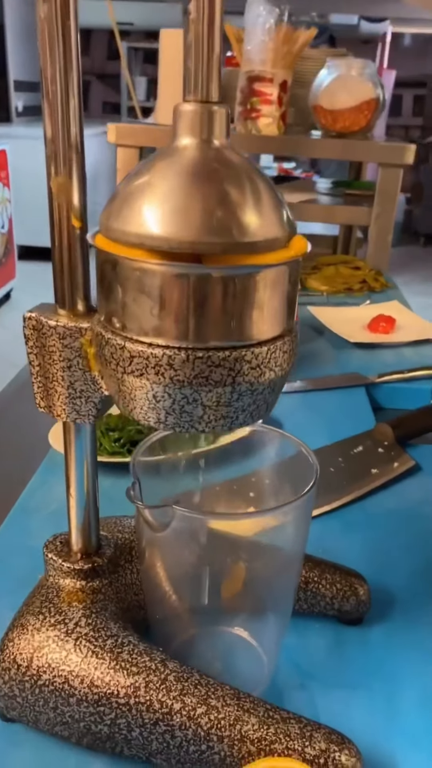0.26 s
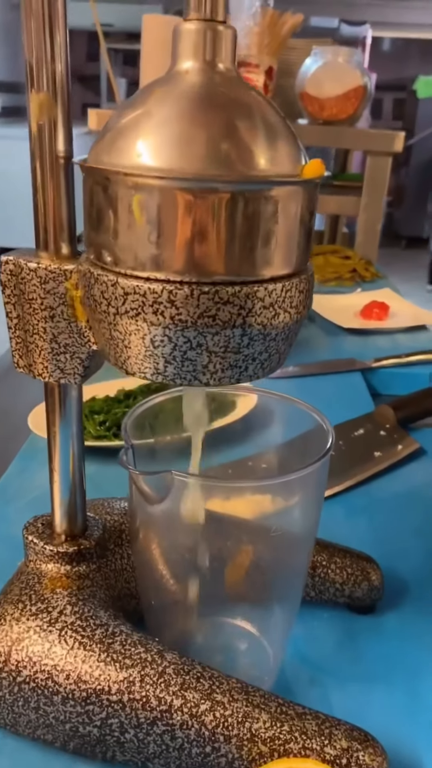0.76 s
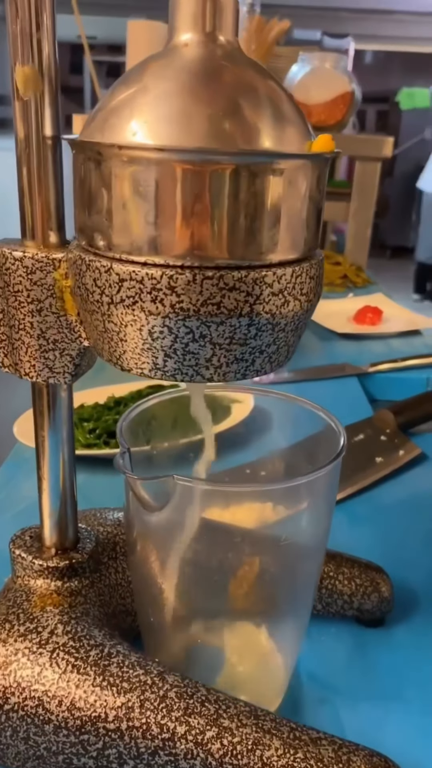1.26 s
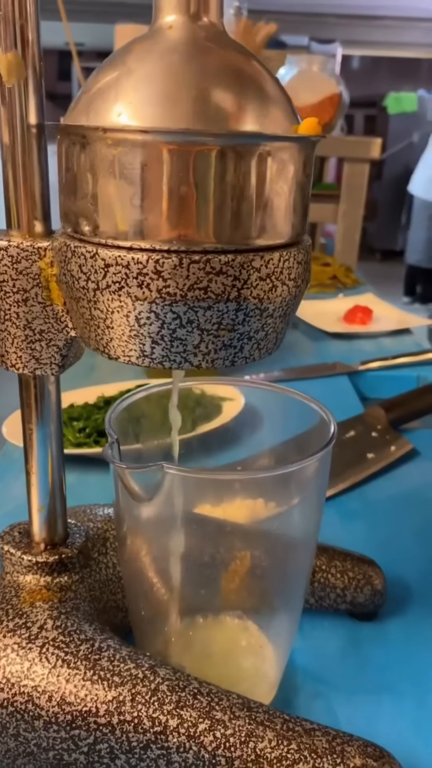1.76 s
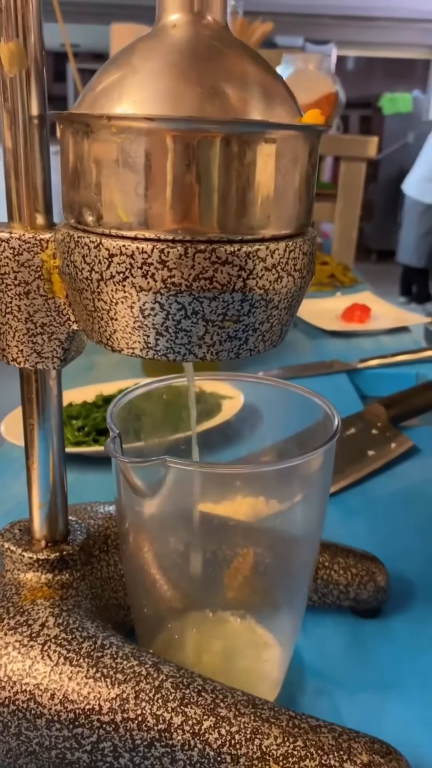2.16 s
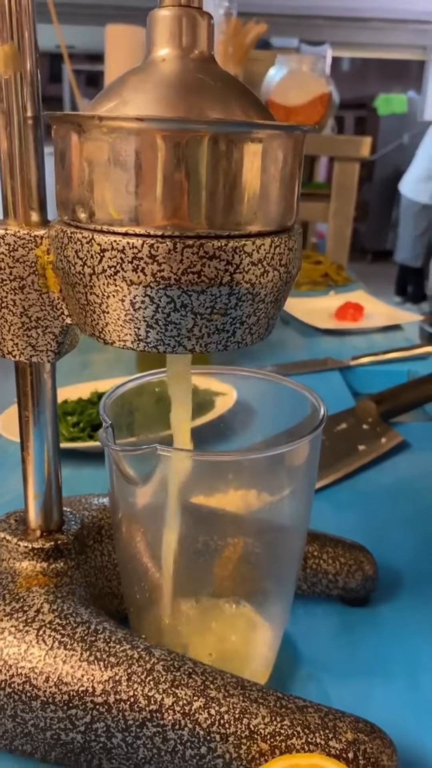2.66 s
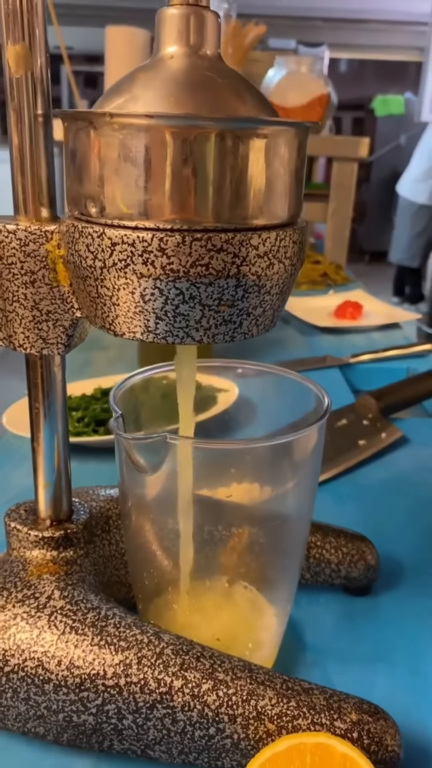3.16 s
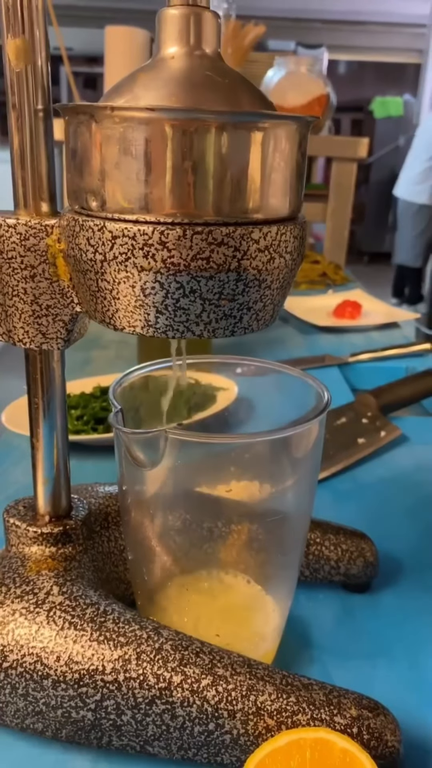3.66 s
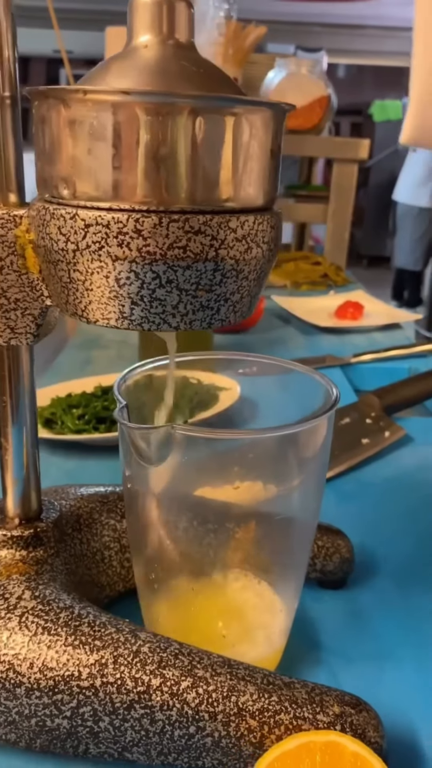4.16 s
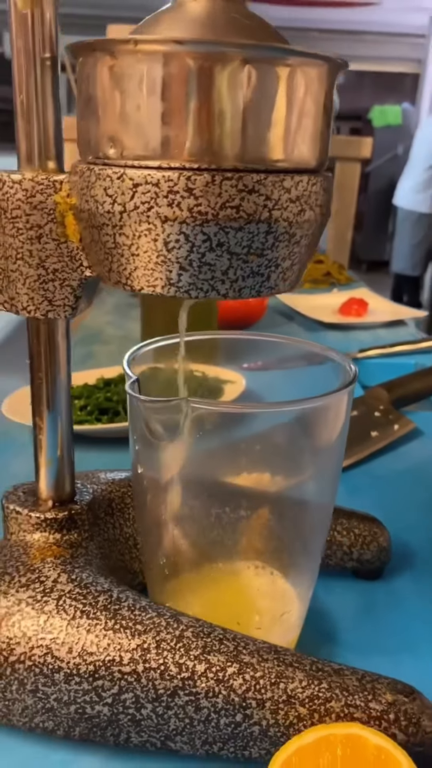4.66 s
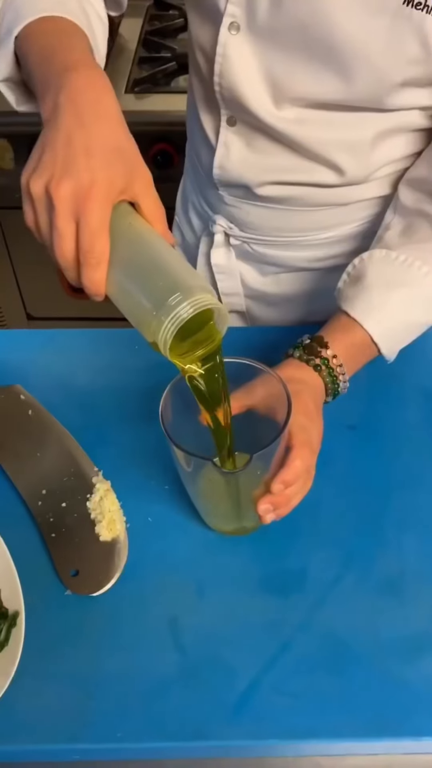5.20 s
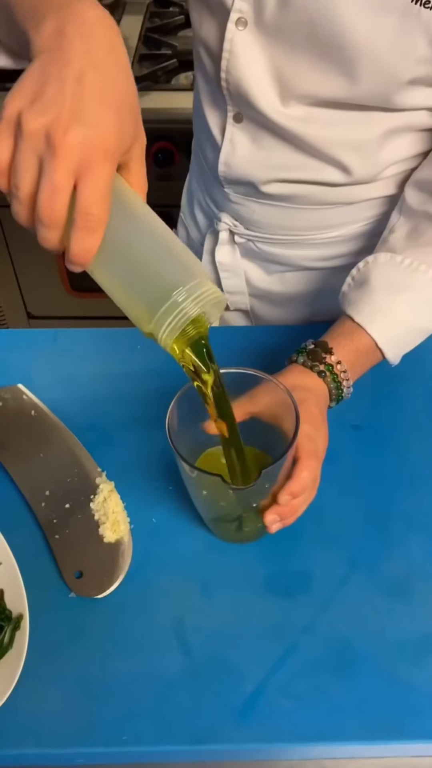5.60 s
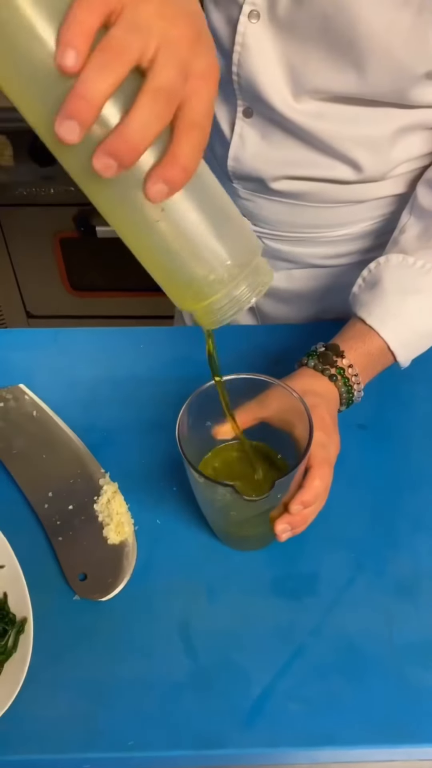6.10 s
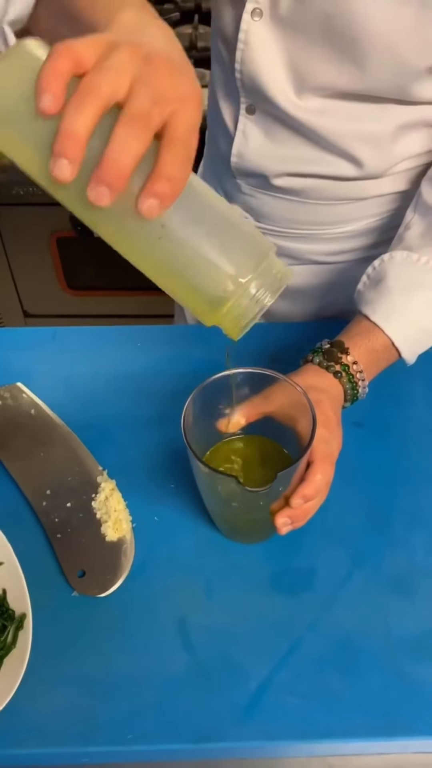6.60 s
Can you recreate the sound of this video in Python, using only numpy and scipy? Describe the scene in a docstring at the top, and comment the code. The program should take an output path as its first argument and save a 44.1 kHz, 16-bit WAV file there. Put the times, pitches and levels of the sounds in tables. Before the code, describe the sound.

A low, steady ventilation hum with airy noise fills a restaurant kitchen, heard in stereo. Close to the microphone, juice drips from a lever citrus press into a plastic jug, sparsely at first, then from about 0.7 seconds as an uneven trickle of wet splats and small ringing bubbles. The dripping is busiest between 2.4 and 3 seconds. The metal press knocks with a short ring at about 3 and 3.4 seconds, and its shaft gives a faint, high squeak around 3.7 seconds. The drops thin out, and the press clacks again at 4.6 seconds. At 4.85 seconds the sound cuts abruptly to a much quieter scene with only a soft hum. Oil pours almost silently, with just two faint drops near 5.1 seconds. Far across the kitchen, dishes clink at 5.7 seconds, then several times more softly between 6.2 and 6.8 seconds.

```python
"""Citrus press in a kitchen

Close to the stereo microphone, a lever press squeezes juice into a plastic jug over the low hum of
ventilation. Drops splat and trap ringing bubbles; the press knocks and its sliding shaft squeaks.
Then a cut to a much quieter scene: oil pours almost silently and dishes clink far across the kitchen."""
import sys
import numpy as np
from scipy import signal
from scipy.fft import rfft, irfft, next_fast_len
from scipy.io import wavfile
from scipy.ndimage import uniform_filter1d

SR = 44100
rng = np.random.default_rng(int(sys.argv[2]) if len(sys.argv) > 2 else 0)


def dump(signal):
    """Clip the signal to [-1, 1] and save it as 16-bit WAV at the path in sys.argv[1]."""
    limited = np.clip(np.atleast_2d(signal).T, -1, 1)
    pcm = np.round(limited * 32767).astype(np.int16)
    wavfile.write(sys.argv[1], SR, pcm)


N = 301644
CUT_S = 4.85  # the quiet scene begins


def gain_of(db):
    """Decibels to gain."""
    return 10 ** (np.asarray(db) / 20)


def unit_rms(x):
    """Scales to rms 1."""
    return x / np.sqrt(np.mean(x ** 2) + 1e-20)


def value_at(points, hz):
    """Interpolates (frequency, value) points on a log-frequency axis."""
    freqs, values = np.transpose(points)
    return np.interp(np.log(hz + 1), np.log(freqs + 1), values)


def fader(points):
    """Gain at every sample from (time [s], level [dB]) points."""
    times, levels = np.transpose(points)
    return gain_of(np.interp(np.arange(N) / SR, times, levels))


def add(mix, start, sound):
    """Mixes a sound in at start seconds."""
    part = mix[..., round(start * SR):][..., :sound.shape[-1]]
    part += sound[..., :part.shape[-1]]


def colour(x, points):
    """Equalises x by (frequency [Hz], gain [dB]) points."""
    size = next_fast_len(N + SR // 4)
    response = gain_of(value_at(points, np.fft.rfftfreq(size, 1 / SR)))
    return irfft(rfft(x, size) * response, size)[..., :N]


def resonate(x, hz, width):
    """One resonance: shifts hz down to zero, smooths, shifts back."""
    turn = np.exp(2j * np.pi * hz * np.arange(len(x)) / SR)
    pole = np.exp(-np.pi * width / SR)
    return 2 * (turn * signal.lfilter([1 - pole], [1, -pole], x / turn + 1e-18)).real


def band(x, hz, width):
    """The same resonance twice, for steeper skirts."""
    return resonate(resonate(x, hz, width), hz, width)


def patchy_noise(depth_db):
    """White noise whose level drifts in patches of time and frequency."""
    real, imag, drift = rng.standard_normal((N // 128 + 5, 257, 3)).T
    drift = unit_rms(uniform_filter1d(uniform_filter1d(drift, size=8, axis=0), size=20, axis=1))
    return signal.istft((real + 1j * imag) * gain_of(depth_db * drift), nperseg=512, noverlap=384)[1][:N]


# Resonances of the kitchen duct: (frequency [Hz], nominal width [Hz], level [dB])
DUCT_MODES = [(49, 5.3, -16.5), (106.3, 14.8, -4), (125.6, 7, -12.5), (176.31, 5.05, 0), (200.2, 12, -8),
              (238.5, 30, -15), (415.6, 6.4, -16.5), (330.4, 45, -16), (490.8, 12, -20), (566, 18, -28),
              (631.7, 24, -23), (757, 23, -27.5), (833.6, 54, -28)]
def duct_hum(steadiness=0.6, waver_db=1.07, waver_s=1):
    """Air noise rings the duct in fuzzy tones; quick swells are partly evened out, a slow waver added."""
    flow = rng.standard_normal(N)
    hum = unit_rms(sum(gain_of(db) * unit_rms(band(flow, hz, 1.27 * width))
                       for hz, width, db in DUCT_MODES))
    power = uniform_filter1d(hum ** 2, size=5000) + 1e-3
    waver = unit_rms(band(rng.standard_normal(N), 0, 1 / waver_s))
    return unit_rms(hum / power ** (steadiness / 2)) * gain_of(waver_db * waver)


# Kitchen air in the mid and side channels, one list a scene: (frequency [Hz], level [dB])
AIR_MID_SPECTRA = [
    [(15, -70), (25, -22.5), (53, -16), (92, -2.5), (135, -7.5), (185, -1), (279, -11), (401, -13),
     (549, -19), (619, -20.5), (1790, -33.5), (2800, -38), (4940, -43), (5570, -41), (6700, -47.5),
     (7100, -58), (8000, -103), (10400, -133), (17600, -120)],
    [(15, -62), (25, -4), (177, -2.5), (236, -11.5), (339, -5.5), (499, -17), (789, -20), (2770, -35),
     (4380, -38.5), (4940, -43), (5990, -39.5), (6600, -52.5), (8000, -87), (10400, -108), (17600, -120)],
]
AIR_SIDE_SPECTRA = [
    [(35, -55.5), (60, -27.5), (103, -29.5), (183, -5.5), (268, -7.5), (819, -9), (1140, -17.5),
     (1710, -30), (2680, -24), (3910, -36), (8360, -28.5), (10700, -32), (12500, -85), (16200, -107),
     (22000, -120)],
    [(35, -45), (60, -50), (168, -39.5), (245, -8), (536, -1), (1200, -12), (1830, -29), (2680, -14),
     (4090, -37), (7310, -31), (12500, -46), (16200, -84), (22000, -120)],
]
# Side air relative to mid air, one value a scene: (level [dB])
AIR_SIDE_LEVELS = [-10.5, -9.5]
# The air swells near the press and drops at the cut, one list a scene: (time [s], level [dB])
AIR_LEVELS = [
    [(0, -37), (1.2, -35.5), (2.4, -34.5), (2.7, -33), (4.84, -33.5)],
    [(4.87, -54), (5.8, -53), (6.84, -52.5)],
]
def ventilation(hum_over_air_db=(2, 1.5)):
    """Broad air noise all round the microphone with the duct hum in the centre, as mid and side."""
    mid, side = np.zeros((2, N))
    before_cut = np.clip((CUT_S - np.arange(N) / SR) / 0.008, 0, 1)
    hum = duct_hum()
    mid_noise, side_noise = patchy_noise(depth_db=2.5), patchy_noise(depth_db=4.5)
    for k, share in enumerate((before_cut, 1 - before_cut)):
        level = share * fader(AIR_LEVELS[k])
        mid += level * (unit_rms(colour(mid_noise, AIR_MID_SPECTRA[k])) + gain_of(hum_over_air_db[k]) * hum)
        side += level * gain_of(AIR_SIDE_LEVELS[k]) * unit_rms(colour(side_noise, AIR_SIDE_SPECTRA[k]))
    return np.array([mid, side])


# Reverberation of the kitchen: (frequency [Hz], t60 [s])
KITCHEN_DECAY = [(300, 0.78), (1500, 0.2), (4000, 0.31), (8000, 0.031)]
def kitchen_echo(x):
    """Sparse reflections of random sign reach left and right, each band dying at its own speed."""
    taps = np.zeros((2, SR // 2))
    arrivals = np.arange(200, SR // 2 - 20, 20) + rng.integers(0, 20, (2, (SR // 2 - 201) // 20))
    np.put_along_axis(taps, arrivals, rng.choice([-1., 1.], arrivals.shape), 1)
    hz, t, bands = signal.stft(taps, SR, nperseg=256)
    decay = gain_of(-60 * t / value_at(KITCHEN_DECAY, hz)[:, None])
    tail = signal.istft(bands * decay, SR, nperseg=256)[1]
    return signal.fftconvolve(x[None], tail / np.linalg.norm(tail[0]), axes=1)[:, :N]


def strike(blows, modes, roughness, flutter_hz):
    """Blows ring a set of modes; loose contact makes the higher ones flutter, a crack fills the gaps."""
    out, t = np.zeros(N), np.arange(SR // 2) / SR
    for start, db, centre_hz, spread, ring, crack_db in blows:
        noise = rng.standard_normal(len(t))
        crack = unit_rms(band(noise, centre_hz, centre_hz * spread))
        sound = gain_of(crack_db) * crack * np.exp(-t / (0.02 * ring))
        for hz, mode_db, t60 in modes:
            loose = np.clip(roughness * hz / (hz + 900), 0, 1)
            pure = np.sin(2 * np.pi * (hz * t + rng.random()))
            flutter = unit_rms(resonate(noise, hz, flutter_hz))
            struck_db = mode_db - 4.1 * (np.log2(hz / centre_hz) / spread) ** 2
            sound += gain_of(struck_db - 60 * t / (t60 * ring)) * ((1 - loose) * pure + loose * flutter)
        sound *= 1 - np.exp(-t / 0.001)
        add(out, start, gain_of(db) * sound / abs(sound).max())
    return out


# Modes of the crockery: (frequency [Hz], level [dB], t60 [s])
DISH_MODES = [(1072, 4, 0.29), (1354, -5, 0.2), (1600, 1, 0.4), (1750, 1, 0.35), (2485, 4.5, 0.35),
              (2860, 0, 0.3), (3080, -1.5, 0.25), (3840, 4, 0.29), (4000, 2, 0.27), (4280, -11, 0.22),
              (5520, 8, 0.25), (6020, 3, 0.28), (6300, -11, .15), (6700, 4, 0.2), (7130, 14, 0.2)]
# Far clinks: (time [s], level [dB], centre [Hz], spread [octaves], ring time [factor], crack [dB])
DISH_BLOWS = [(5.725, -29, 4170, 1.34, 1.38, 13), (6.207, -44, 1060, 0.34, 1.2, -8),
              (6.208, -52, 2580, 0.57, 1, -2), (6.373, -52, 1600, 0.2, 0.88, -11),
              (6.444, -48.5, 2880, 1, 3, 11), (6.691, -42.5, 2370, 1.46, 4, 20),
              (6.75, -46, 1750, 0.063, 1, 3)]
def dish_clinks():
    """Dishes touch loosely and ring at the far end of the kitchen."""
    return strike(DISH_BLOWS, DISH_MODES, roughness=0.9, flutter_hz=70)


# Brief flares of treble: (time [s], level [dB])
FLARE_EVENTS = [(0.804, -52), (1.1912, -59), (1.228, -45.5), (1.63, -56.5), (1.738, -49.5), (1.749, -45.5),
                (2, -58), (2.4253, -40.5), (2.469, -39), (2.785, -50), (3.035, -39.5), (3.345, -41),
                (3.639, -54), (3.67, -39), (4.379, -48.5), (4.583, -49), (4.606, -49)]
# Their colour: (frequency [Hz], gain [dB])
FLARE_SPECTRUM = [(6500, -20), (7500, 4), (9500, 2), (11800, 21.5)]
def treble_flares(rise_s=0.0065):
    """High hiss flares briefly at the sharpest splats and knocks."""
    out, age = np.zeros(N), np.arange(2000) / SR / rise_s
    for start, db in FLARE_EVENTS:
        add(out, start, gain_of(db) * age * np.exp(1 - age) * rng.standard_normal(len(age)))
    return colour(out, FLARE_SPECTRUM)


# Modes of the press shaft: (frequency [Hz], width [Hz], level [dB])
SHAFT_MODES = [(2600, 100, 6), (4200, 250, 2.5), (5680, 160, 6), (6870, 200, -14), (7220, 100, 5)]
# The shaft slides in its guide, close by: (time [s], level [dB])
SHAFT_SLIDE = [(3.57, -81), (3.63, -61.5), (3.70, -55.5), (3.78, -65), (3.82, -59), (3.87, -79)]
def shaft_squeak():
    """Uneven slips of the shaft scrape its modes, each in its own fits."""
    squeak, t = np.zeros(N), np.arange(N) / SR
    for hz, width, db in SHAFT_MODES:
        fits = unit_rms(uniform_filter1d(rng.standard_normal(N), size=700))
        scrape = resonate(resonate(rng.standard_normal(N), hz, width), hz, 3 * width)
        squeak += gain_of(db + 4.1 * fits) * unit_rms(scrape)
    sliding = (t > SHAFT_SLIDE[0][0]) & (t < SHAFT_SLIDE[-1][0])
    return squeak * fader(SHAFT_SLIDE) * sliding


# Modes of the press: (frequency [Hz], level [dB], t60 [s])
PRESS_MODES = [(325, 12.5, 0.15), (395, 11, 0.16), (576, 4, 0.14), (747, 4, 0.11), (792, 4.5, 0.16),
               (1560, -3, 0.54), (1604, 1.5, 0.17), (1885, 0.5, 0.28), (2250, -12, 0.48), (2850, -5, 0.45),
               (2990, -5.5, 0.3), (3877, 0, 0.2), (4220, -10, 0.26), (4720, -2, 0.36), (5020, -9.5, 0.5),
               (6100, -13.5, 0.3), (7150, 10, 0.1)]
# Close knocks: (time [s], level [dB], centre [Hz], spread [octaves], ring time [factor], crack [dB])
PRESS_BLOWS = [(3.042, -14.5, 1560, 1.1, 1.38, 6.5), (3.047, -16.5, 373, 0.65, 0.85, 8.5),
               (3.049, -14.5, 826, 0.29, 0.3, -0.5), (3.08, -20, 800, 0.44, 0.65, 1.5),
               (3.358, -18.5, 2900, 2.26, 1.2, -0.5), (3.366, -42.5, 4000, 0.2, 1.7, -11.5),
               (4.572, -27, 3200, 1, 0.12, 10), (4.573, -39, 1604, 0.087, 0.72, -13),
               (4.574, -21, 394, 0.24, 0.14, 3), (4.589, -29.5, 3800, 0.65, 0.06, 5),
               (4.5965, -17, 576, 0.12, 0.37, -10.5), (4.611, -32, 3020, 1.2, 0.13, 0),
               (4.612, -47, 1604, 0.045, 2.8, -9)]
def press_knocks():
    """The press knocks on its stand and rings, near the microphone."""
    return strike(PRESS_BLOWS, PRESS_MODES, roughness=0.66, flutter_hz=74.5)


# Air column of the plastic jug: (frequency [Hz], width [Hz], level [dB])
JUG_MODES = [(1450, 300, 0), (2780, 400, 0), (4150, 550, -1), (5500, 900, -2), (8500, 5000, -2)]
def jug(stereo):
    """The air over the juice resonates, colouring each channel."""
    return np.array([sum(gain_of(db) * resonate(channel, hz, width) * np.sqrt(500 / width)
                         for hz, width, db in JUG_MODES) for channel in stereo])


def bubble(hz, t60, rise, samples):
    """A trapped bubble swells and rings, its pitch rising and its ring cut short near the surface."""
    t = np.arange(samples) / SR
    envelope = gain_of(-60 * (t / t60) ** 1.5) * (1 - np.exp(-(t * hz / 3) ** 1.5))
    return np.sin(2 * np.pi * hz * t * (1 + rise * t / t60)) * envelope


# Juice streaming into the jug, close up: (time [s], level [dB])
JUICE_FLOW = [(0, -82), (0.5, -64.5), (1.0, -56.5), (1.7, -57.5), (1.88, -58), (1.98, -47), (2.07, -59),
              (2.38, -56), (2.5, -52.5), (2.6, -43), (2.83, -53), (3.26, -54), (3.41, -43), (3.65, -59.5),
              (3.88, -64), (4.05, -56), (4.57, -55), (4.69, -69), (4.84, -89)]
def spatter(droplets_per_s=3000, pitches=24):
    """The stream breaks into droplets of many sizes, each a short pitched blob, over a wet crackle."""
    sizes = gain_of(3.3 * np.minimum(rng.exponential(1, N), 5))
    droplets = sizes * (rng.random(N) < droplets_per_s / SR)
    pitch_index, blobs = rng.integers(0, pitches, N), np.zeros((2, N))
    for k, hz in enumerate(np.geomspace(1300, 7000, pitches)):
        blob = bubble(hz, t60=24 / hz, rise=0.18, samples=800) * gain_of(7.5 * np.log2(hz / 3000))
        blobs[k % 2] += signal.oaconvolve(droplets * (pitch_index == k), blob)[:N]
    age = np.arange(600) / 180
    bursts = signal.oaconvolve(droplets * (pitch_index < 8), age * np.exp(-age))[:N]
    crackle = jug(bursts * rng.standard_normal((2, N)))
    blobs = jug(blobs + 0.5 * blobs[::-1])  # each channel also hears the other's droplets
    stream = unit_rms(unit_rms(blobs) + 0.9 * unit_rms(crackle))
    return stream * fader(JUICE_FLOW) * (np.arange(N) < CUT_S * SR)


# Close drops of juice in the jug and, after the cut, the first oil:
# (time [s], level [dB], bubble pitch [Hz], relative splat level [dB])
DROP_EVENTS = [(0.0933, -47, 2850, 10.5), (0.404, -51, 2720, 13), (0.53, -48, 4300, 10),
               (0.695, -41, 2400, -13), (0.7661, -32.5, 1490, -1), (0.786, -25, 4260, -25),
               (0.816, -18.5, 1400, -11), (0.8175, -32.5, 2180, -7), (0.82, -30, 3240, -12),
               (0.8226, -27, 2650, -20), (0.847, -37.5, 4300, 9), (0.894, -35, 5150, 2),
               (0.9232, -27, 3980, 0), (1.031, -45.5, 1450, 21), (1.085, -30, 4230, 0),
               (1.187, -46, 2760, 14.5), (1.2365, -19.5, 3890, -15.5), (1.311, -32, 3380, -1),
               (1.3278, -39.5, 4350, 8), (1.3492, -30.5, 5300, -6.5), (1.499, -39.5, 1490, 4),
               (1.763, -19, 5730, -13.5), (1.78, -41, 2000, -2.5), (1.81, -44, 2280, -10),
               (1.82, -40, 3400, -13), (1.924, -40.5, 2270, 7.5), (1.998, -36.5, 4000, 5.5),
               (2.074, -40, 2050, -7), (2.0945, -45.5, 1070, -3), (2.106, -32.5, 915, -10.5),
               (2.114, -37, 1390, -12), (2.181, -39.5, 3950, -5), (2.182, -41.5, 1110, -8),
               (2.191, -35, 1010, 1.5), (2.274, -45.5, 1067, -7), (2.3, -39.5, 3000, 5),
               (2.353, -29.5, 5200, -21), (2.4266, -23, 2860, 0.5), (2.44, -29.5, 3380, -6.5),
               (2.458, -32, 5200, -7), (2.4738, -36.5, 3440, 1.5), (2.5054, -29.5, 1777, 5.5),
               (2.506, -38, 2940, -16), (2.513, -25.5, 4520, -24), (2.535, -31, 1476, 4),
               (2.538, -35.5, 2950, -9), (2.549, -28.5, 966, -4), (2.557, -29.5, 998, -3.5),
               (2.581, -25, 1453, 1), (2.585, -30, 4700, 1.5), (2.61, -42, 4180, -8),
               (2.631, -33.5, 1940, -12), (2.649, -33, 3020, -12), (2.658, -32, 3130, -4),
               (2.666, -34, 3120, -2), (2.678, -29, 1480, 5.5), (2.706, -26.5, 2700, -4),
               (2.722, -23, 2620, -8.5), (2.7233, -24, 1855, -7), (2.7333, -26, 2640, 3.5),
               (2.787, -34.5, 2860, 0), (2.789, -27.5, 6300, -7), (2.805, -38, 2860, 0),
               (2.8264, -22, 1320, -24.5), (2.868, -37.5, 1600, 4), (2.897, -32.5, 3300, 1),
               (2.935, -40, 2870, -10.5), (2.959, -14.5, 2850, -13), (2.976, -28, 2820, -19.5),
               (2.99, -26.5, 1505, 4), (3.301, -34, 4450, -24), (3.314, -19, 545, -28),
               (3.362, -17.5, 846, -28.5), (3.21, -35.5, 1600, 4.5), (3.235, -36, 3600, 4),
               (3.459, -30.5, 1640, -14), (3.536, -28.5, 5100, -9), (3.547, -34.5, 1480, -21),
               (3.814, -30.5, 887, -0.5), (3.935, -39, 2810, 11), (4.0656, -33, 2290, -4),
               (4.3866, -43.5, 1035, 13.5), (4.491, -33.5, 1530, -4), (4.52, -34, 4350, -5),
               (4.559, -31.5, 4500, -29), (4.6906, -36.5, 2980, 1.5), (4.7875, -29.5, 4600, -3.5),
               (5.051, -37.5, 2410, -6), (5.069, -44, 2980, 2)]
def drops(ring_cycles=12, ring_s=0.0058, pool_pan_db=-1.5, scatter_db=5.5, stray_s=0.000015):
    """Each drop traps a quick bubble, with a wet blur at its pitch and a sharp splat through the jug."""
    plops, splats = np.zeros((2, 2, N))
    t = np.arange(3000) / SR
    splat_envelope = (np.exp(-t / 0.0025) + 0.25 * np.exp(-t / 0.014)) * (1 - np.exp(-t / 0.001))
    for start, db, hz, splat_db in DROP_EVENTS:
        pan_db = rng.normal(pool_pan_db, scatter_db)  # where it lands, left minus right
        lag_s = rng.normal(0, stray_s)  # between the two microphone ports
        splat = rng.standard_normal(len(t)) * splat_envelope
        blur = band(splat, hz, 0.45 * hz) * np.sqrt(6000 / hz)
        plop = bubble(hz, t60=ring_cycles / hz + ring_s, rise=0.08, samples=len(t)) + 0.35 * blur
        plop = 0.67 * plop / abs(plop).max()
        for channel, sign in enumerate((1, -1)):
            arrival, gain = start + sign * lag_s / 2, gain_of(db + sign * pan_db / 2)
            add(plops[channel], arrival, gain * plop)
            add(splats[channel], arrival, gain * gain_of(splat_db) * splat)
    return plops + jug(splats)


# Tone of the centre sound, dull above about 7 kHz: (frequency [Hz], gain [dB])
MID_TONE = [(5800, -1), (6600, -1), (7200, -8.5), (12000, -78)]
# Stereo width of the near sounds: (frequency [Hz], gain [dB])
SIDE_TONE = [(80, -46.5), (250, -24.5), (700, -3.5), (2000, -9.5), (4000, -11), (10500, -1), (12500, 10.5)]
# Lean of the stereo picture: (frequency [Hz], left minus right [dB])
STEREO_LEAN = [(40, 0), (70, .4), (150, 2.4), (350, 2.7), (700, 1.8), (1400, .4), (2800, -.7), (6000, -.8),
               (10000, 0)]
def scene():
    """Close juice and press, far dishes and kitchen air meet as mid and side, then as left and right."""
    juice, dishes, press = drops() + spatter(), dish_clinks(), press_knocks()
    treble = shaft_squeak() + treble_flares()
    echo = kitchen_echo(gain_of(-11) * juice.mean(0) + gain_of(-9) * press + gain_of(-6.5) * dishes)
    heard = juice + press + 0.5 * dishes + echo
    cut = round(CUT_S * SR)
    heard[:, cut:cut + 6000] = 0  # the cut ends the first scene's echoes
    close = juice.mean(0) + press
    late = np.append(np.zeros(12), close)[:N]  # the side arrives a little after the mid
    side_echo = gain_of(-8) * kitchen_echo(close)[1] * (np.arange(N) < cut)
    mid = colour(heard.mean(0), MID_TONE) + treble
    side = colour((heard[0] - heard[1]) / 2 + 0.4 * late + side_echo + 0.54 * treble, SIDE_TONE)
    mid, side = np.array([mid, side]) + ventilation()
    early = np.append(mid[2:], [0, 0])  # the left port hears the mid two samples early
    left = colour(early, [(hz, db / 2) for hz, db in STEREO_LEAN]) + side
    right = colour(mid, [(hz, -db / 2) for hz, db in STEREO_LEAN]) - side
    return np.array([left, right])


# Response of the microphone: (frequency [Hz], gain [dB])
MIC_RESPONSE = [(25, -6), (45, -0.5), (11300, 3.5), (12300, -34)]
def record(dry):
    """The microphone colours the sound, and a steep low-pass ends the band at 12.3 kHz."""
    lowpass = signal.firwin(511, 12300, window=("kaiser", 9), fs=SR)
    return signal.oaconvolve(colour(dry, MIC_RESPONSE), lowpass[None], "same")


dry = scene()
out = record(dry)
dump(out)
```